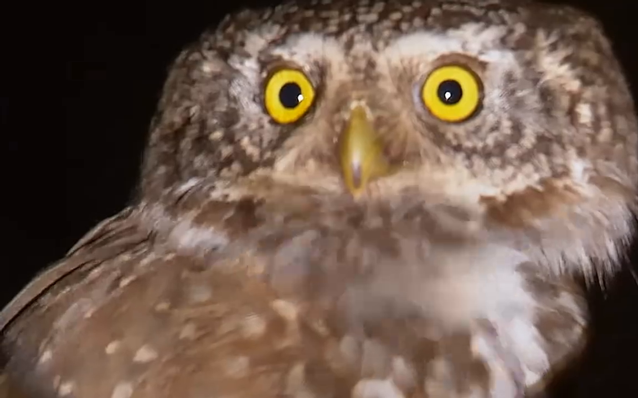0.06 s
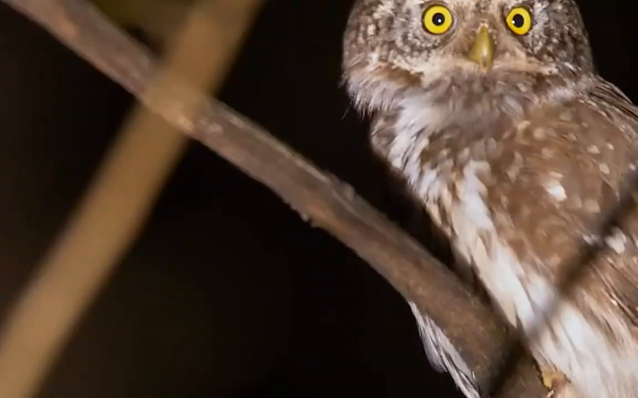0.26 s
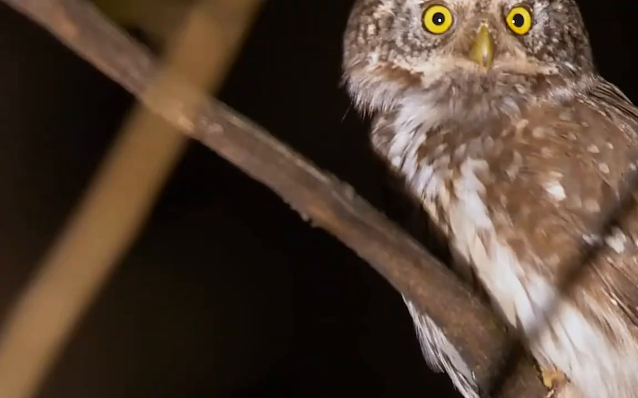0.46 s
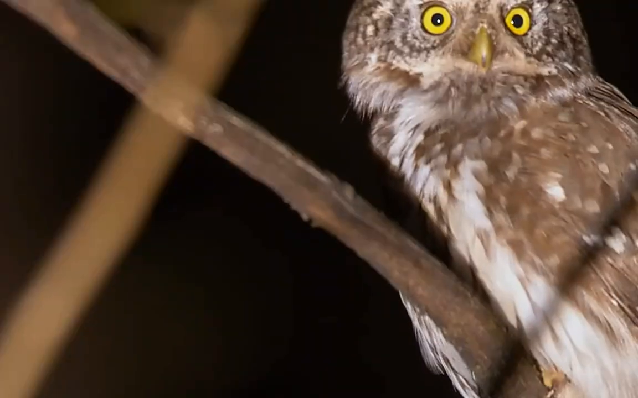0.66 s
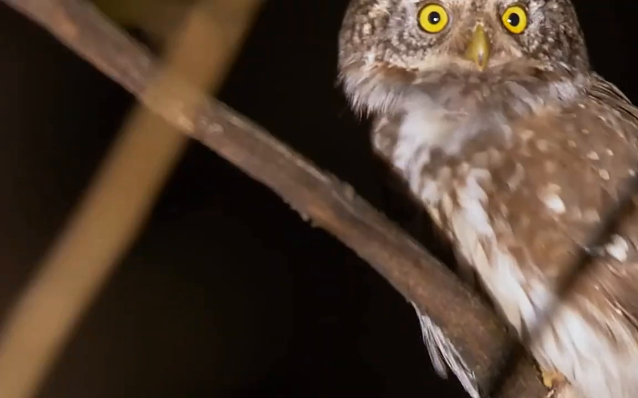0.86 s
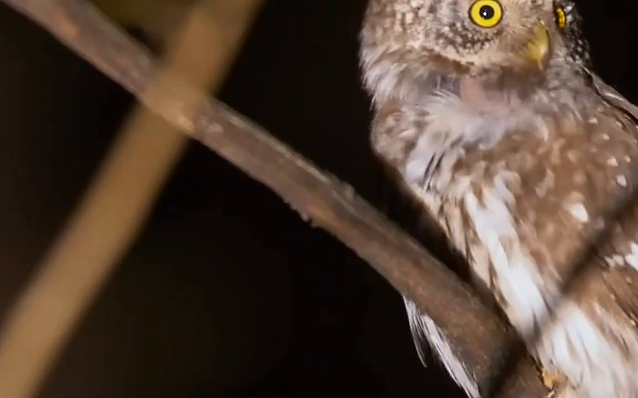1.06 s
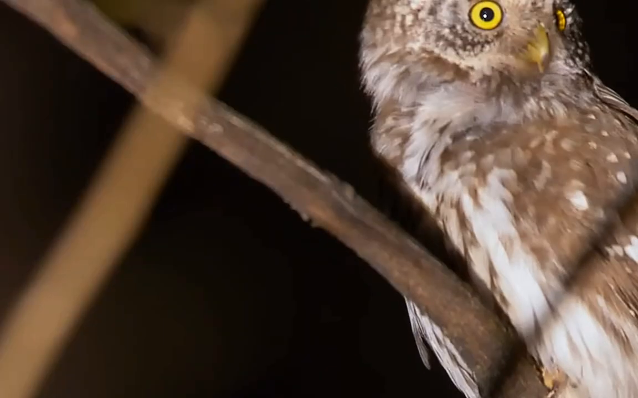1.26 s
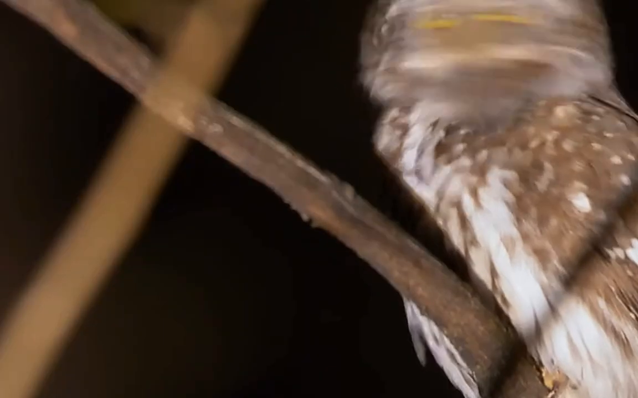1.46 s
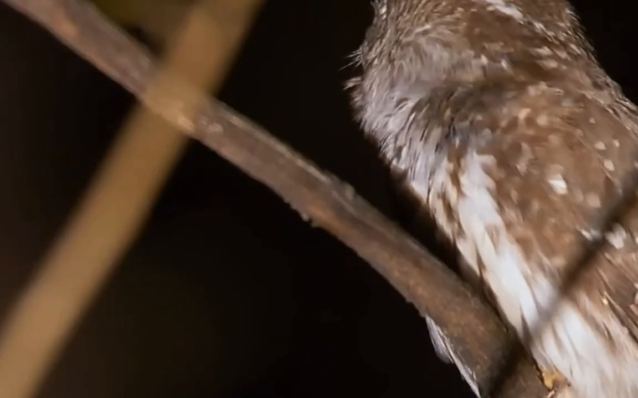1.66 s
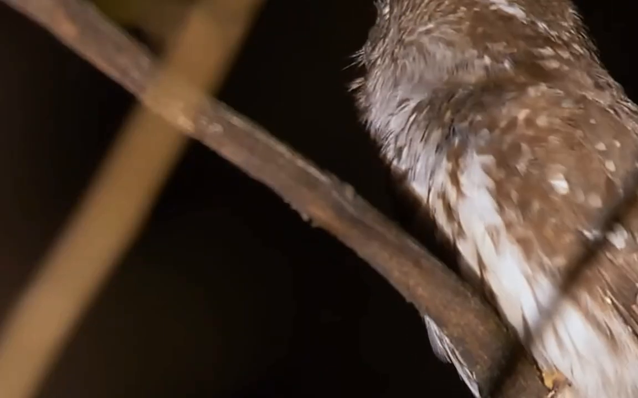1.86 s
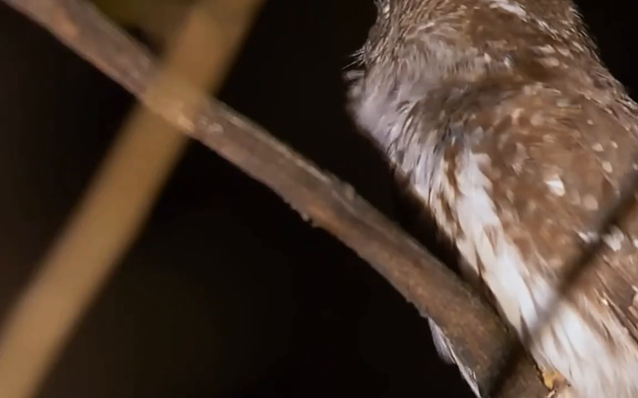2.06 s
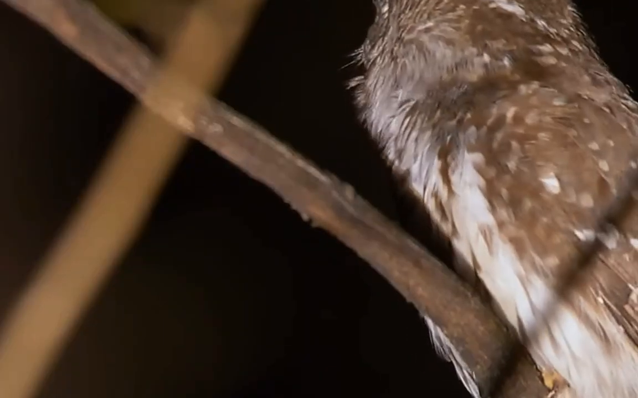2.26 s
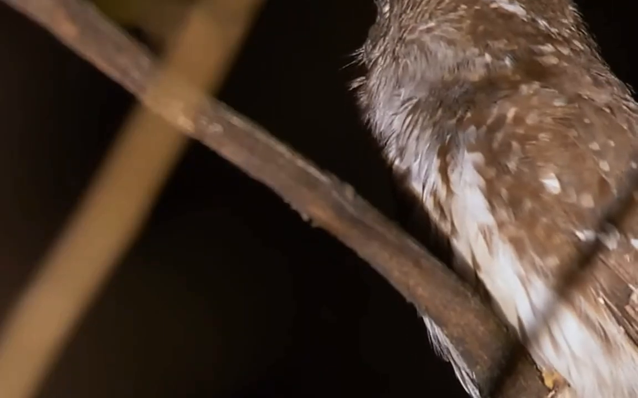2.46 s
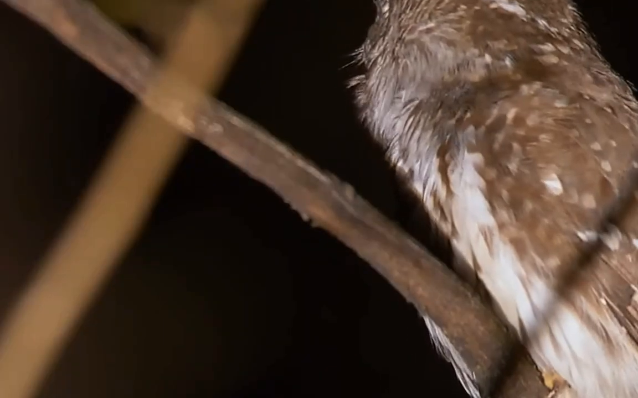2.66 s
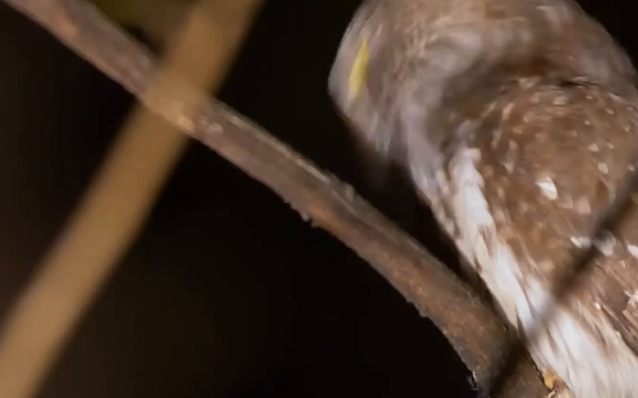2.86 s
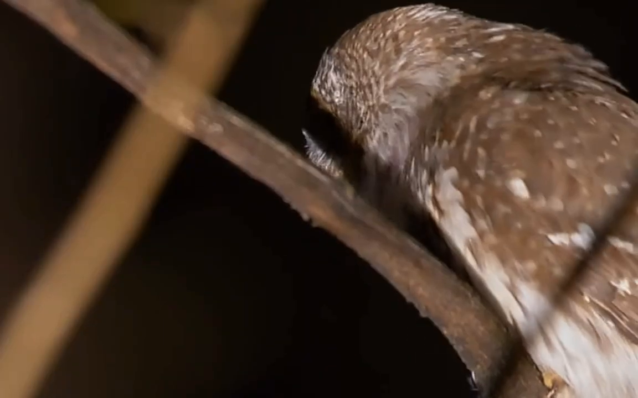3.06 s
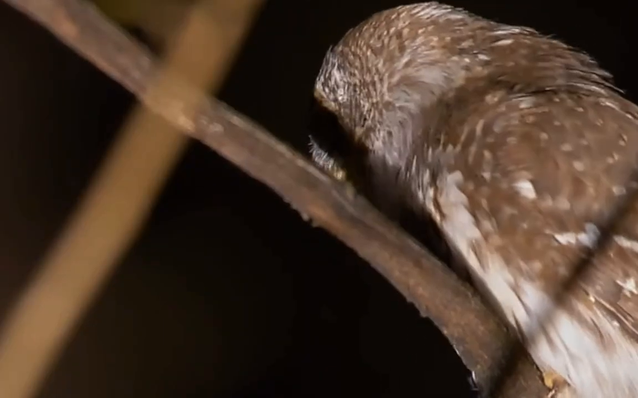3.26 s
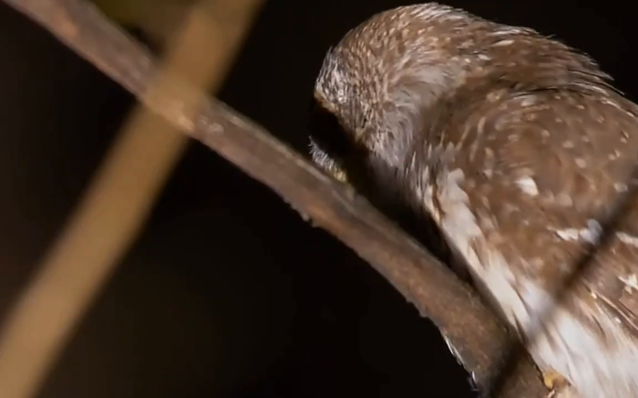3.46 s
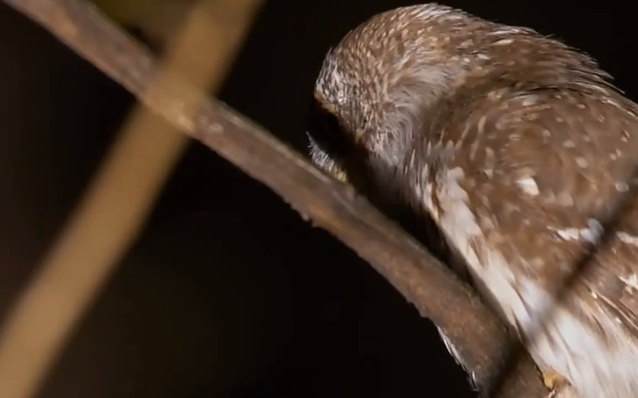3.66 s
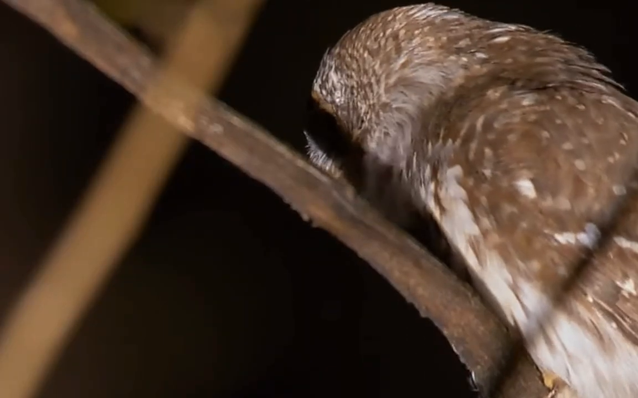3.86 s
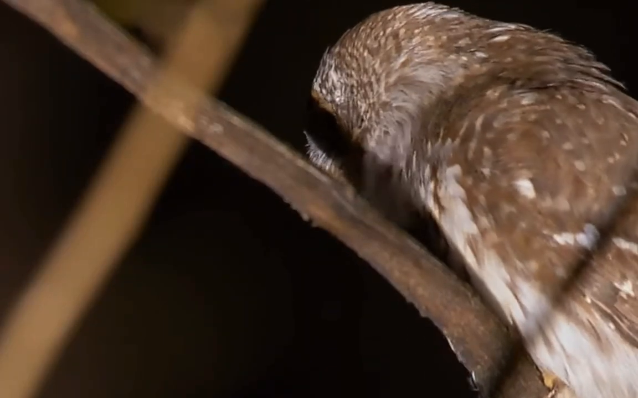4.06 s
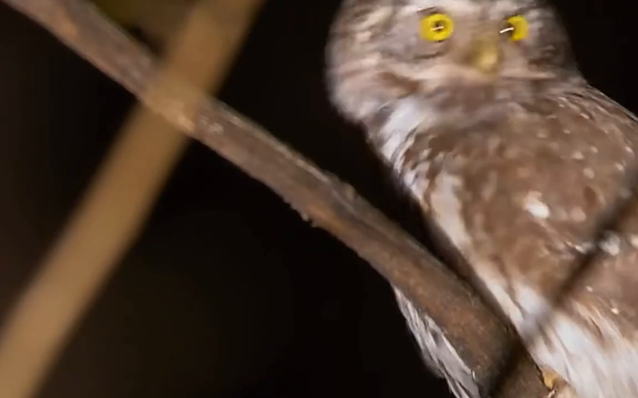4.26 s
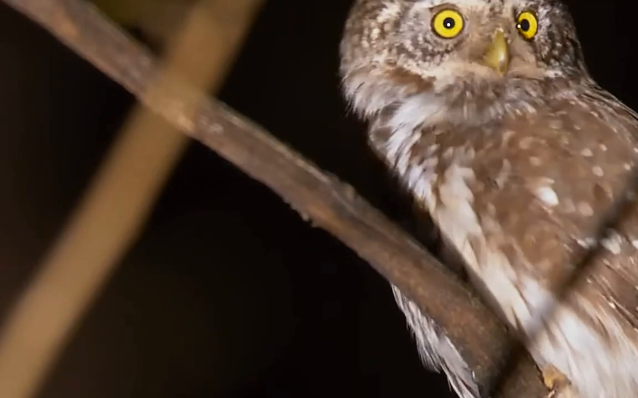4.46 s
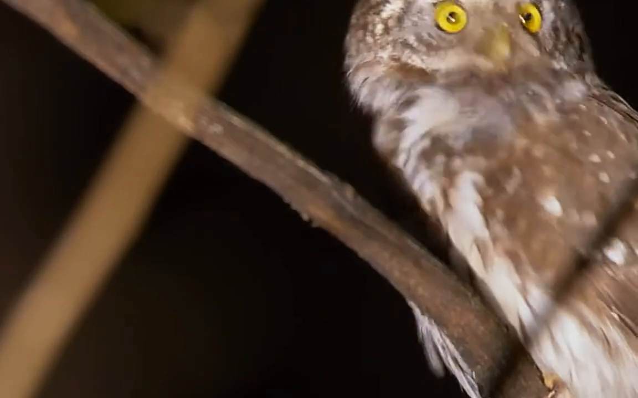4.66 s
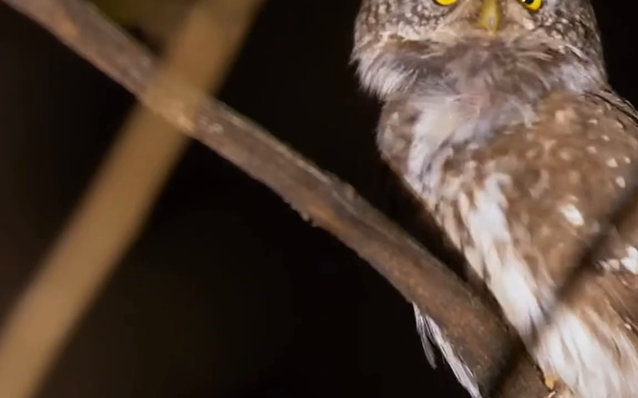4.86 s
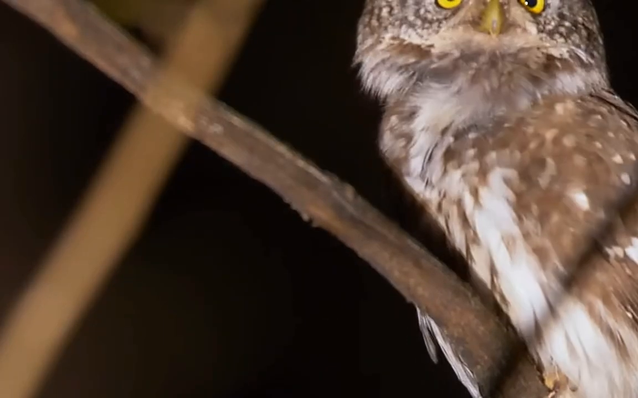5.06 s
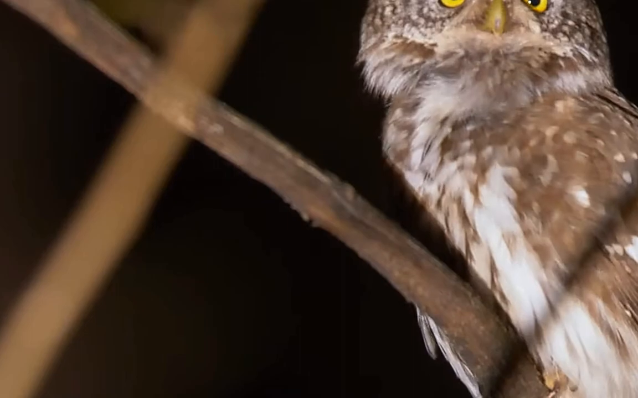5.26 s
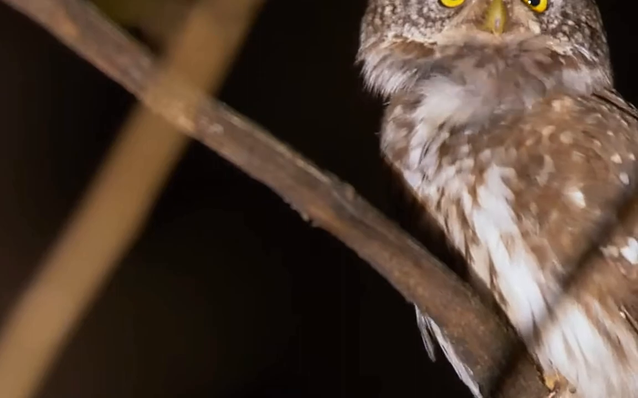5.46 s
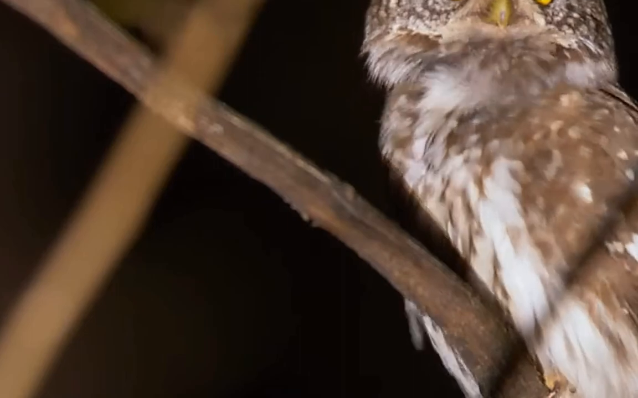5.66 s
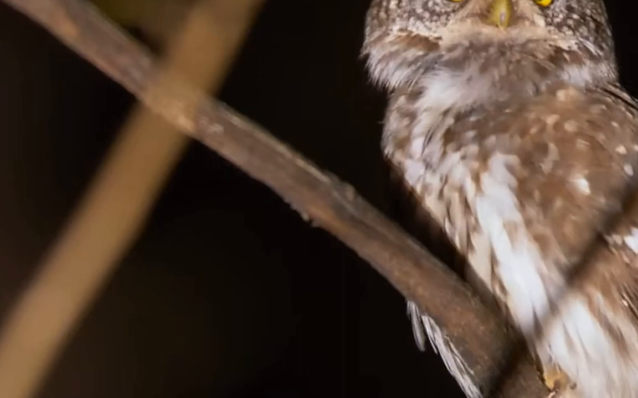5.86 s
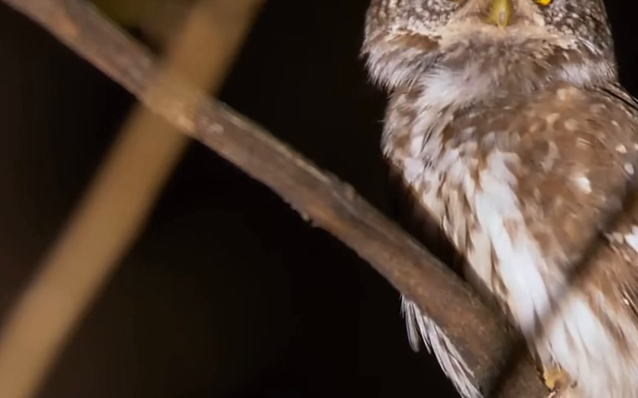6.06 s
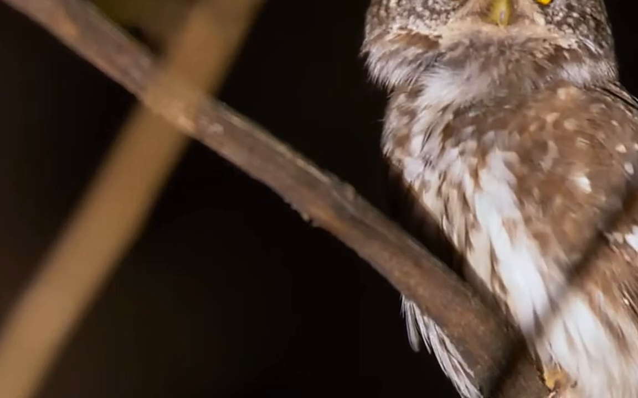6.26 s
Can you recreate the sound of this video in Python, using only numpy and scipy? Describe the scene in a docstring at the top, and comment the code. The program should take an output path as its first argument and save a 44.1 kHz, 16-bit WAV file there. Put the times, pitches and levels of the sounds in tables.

```python
"""Two soft toots over hissing air, then a small owl's long whistle: three whistles, toots before, between, after.
Owl notes are sines on multiples of a pitch curve, with breath noise on the whistles and an echo of the wood.
A far bird mews on harmonics alone; songbirds chirp and trill in gliding sines; shaped noise is the air.
The recorder turns its gain down on loud notes and cuts the top. Table levels are ahead of that gain."""
import sys
import numpy as np
from scipy import signal
from scipy.fft import rfft, irfft
from scipy.io import wavfile
from scipy.ndimage import uniform_filter1d

SR = 44100
rng = np.random.default_rng(int(sys.argv[2]) if len(sys.argv) > 2 else 0)


def unload_audio(sound):
    """Save the sound as a 16-bit wav file, at the path given as the first command line argument."""
    columns = np.transpose(np.atleast_2d(sound))
    # keep every value between -1 and 1, then stretch to whole-number steps
    steps = np.round(np.clip(columns, -1, 1) * 32767)
    wavfile.write(sys.argv[1], SR, steps.astype(np.int16))


N = 278712

# long whistles: t/s, pitch f/Hz, 1x level/dB, 2x level/dB, throat resonance f/Hz, harmonic on it level/dB
WHISTLES = [
    [(0.812, 1295, -33.5, -63, 10940, -89), (0.828, 1354, -21.5, -38, 11070, -82.5),
     (0.856, 1378, -15.5, -36.5, 11150, -78.5), (0.874, 1389, -14, -39, 11100, -51.5),
     (0.904, 1387, -13.5, -32, 10950, -56.5), (0.942, 1398, -15, -41, 10800, -60),
     (0.972, 1378, -13.5, -33, 10930, -57), (1.0, 1397, -11, -37, 10250, -50),
     (1.032, 1388, -14, -41, 10180, -47.5), (1.052, 1382, -14.5, -35.5, 10200, -53),
     (1.066, 1322, -20, -38, 9920, -79)],
    [(2.768, 1268, -39.5, -64.5, 12200, -90.5), (2.784, 1343, -24, -43.5, 12200, -83),
     (2.822, 1376, -15.5, -36.5, 12200, -82.5), (2.846, 1360, -16.5, -35, 12200, -82.5),
     (2.864, 1389, -13.5, -49, 12200, -79.5), (2.885, 1411, -16.5, -41.5, 12200, -57),
     (2.92, 1430, -14.5, -42.5, 12000, -64), (2.945, 1407, -14.5, -43, 11350, -44.5),
     (3.0, 1401, -15.5, -46, 11250, -51.5), (3.018, 1355, -19, -40, 11100, -47),
     (3.032, 1329, -23, -43.5, 11080, -62)],
    [(4.647, 1307, -34.5, -58, 11330, -77.5), (4.661, 1359, -21.5, -38, 11300, -87),
     (4.69, 1399, -15, -41.5, 11300, -83.5), (4.718, 1393, -16, -47.5, 11300, -71),
     (4.734, 1416, -12.5, -34.5, 11200, -56), (4.77, 1403, -15.5, -30, 10750, -50),
     (4.798, 1417, -12.5, -31, 10170, -44), (4.84, 1413, -12.5, -32, 10050, -42.5),
     (4.858, 1394, -15, -36.5, 10050, -45), (4.874, 1388, -9.5, -35, 10000, -45),
     (4.89, 1387, -13, -32.5, 9900, -47), (4.903, 1313, -21.5, -40, 9700, -58.5)],
]
# closing drop: t after last row/s, pitch f/Hz, level change/dB
WHISTLE_DROP = [(0.013, 1234, -6), (.024, 894, -24)]
# 5x harmonic of each whistle: start level/dB, level near the end/dB
FIFTH = [(-76, -59.5), (-79, -69), (-80.5, -57.5)]
# breath, strongest as the note catches: t from start/s, level/dB
BREATH = [(0, -73), (.012, -57.5), (.035, -59), (.055, -74), (.25, -70.5), (.28, -88)]
# breath band edges: f/Hz, f/Hz
BREATH_HZ = (710, 2530)
THIRD_DB = -77
FOURTH_RE_FIFTH_DB, SIXTH_RE_FIFTH_DB = -3, -9.5
GROWTH_POWER = 2.2
WEAK_FADE = 3.5   # dB lost by weak harmonics per dB lost by 1x
SECOND_DROP_SHARE = 0.67   # 2x loses less in the drop
RESONANCE_SLOPE_DB_PER_KHZ = 18
HALF_LINE_FULL_DB = -44


def whistles():
    """Harmonics 4 to 6 grow through the note; 7 to 8.5 fall off either side of a throat resonance."""
    multiples = [1, 1.5, 2, 3, 4, 5, 6, 7, 8, 8.5]
    out = 0
    for rows, (fifth_start_db, fifth_end_db) in zip(WHISTLES, FIFTH):
        end_s, _, end_db, end_second_db, end_top_hz, end_top_db = rows[-1]
        drop = [(end_s + s, hz, end_db + db, end_second_db + SECOND_DROP_SHARE * db,
                 end_top_hz, end_top_db + 2 * db) for s, hz, db in WHISTLE_DROP]
        at, *columns = np.transpose(list(rows) + drop)
        s = np.arange(at[0], at[-1], .002)
        hz, first_db, second_db, top_hz, top_db = (np.interp(s, at, c) for c in columns)

        fade_db = WEAK_FADE * np.minimum(first_db - np.median(first_db) + 2.5, 0)
        along = np.clip((s - at[0]) / (rows[-2][0] - at[0]), 0, 1)
        growth_db = (fifth_end_db - fifth_start_db) * along ** GROWTH_POWER
        fifth_db = fifth_start_db + growth_db + fade_db
        half_db = half_line_db(s)

        high_db = []
        for k in (7, 8, 8.5):
            offset_khz = np.abs(k * hz - top_hz) / 1000
            high_db.append(top_db - RESONANCE_SLOPE_DB_PER_KHZ * offset_khz)
        high_db[2] = high_db[2] + half_db - HALF_LINE_FULL_DB   # 8.5x follows the period doubling

        levels = [first_db, half_db + fade_db / 2, second_db, THIRD_DB + fade_db,
                  fifth_db + FOURTH_RE_FIFTH_DB, fifth_db, fifth_db + SIXTH_RE_FIFTH_DB, *high_db]
        out = out + sing(np.transpose([s, hz, *levels]), multiples, rough_db=-38)
        out = out + noise_band(BREATH, *BREATH_HZ, start_s=at[0])
    return out


# period doublings: start t/s, length/s, 1.5x level/dB
DOUBLINGS = [(.85, 0.038, -54), (.92, 0.033, -53), (.972, 0.042, -53.5), (2.85, 0.095, -45),
             (2.955, 0.043, -61.5), (4.68, .07, -55.5), (4.78, 0.037, -55.5), (4.845, .035, -62.5)]
DOUBLING_REST_DB = -74


def half_line_db(s):
    """Level of the 1.5x line: the voice briefly doubles its period and half lines swell and fade."""
    swells = 0
    for start_s, length_s, db in DOUBLINGS:
        swells = swells + amp(db) * np.sin(np.pi * np.clip((s - start_s) / length_s, 0, 1))
    return 20 * np.log10(swells + amp(DOUBLING_REST_DB))


# toots: start t/s, length/s, first f/Hz, last held f/Hz, early level/dB, late level/dB, 2x level/dB
TOOTS = [ (0.053, 0.055, 1255, 1193, -37, -38, -42.5), (.171, 0.045, 1211, 1104, -40.5, -41, -44.5),
         (2.002, 0.047, 1252, 1212, -36, -36, -44.5), (2.091, 0.068, 1208, 1224, -33, -29, -38.5),
         (3.713, 0.041, 1223, 1224, -45, -55.5, -75), (3.781, 0.081, 1284, 1251, -30.5, -26, -40),
         (3.937, 0.05, 1138, 1081, -36.5, -38, -46), (4.045, .04, 1086, 1045, -42, -36.5, -43),
         (5.463, 0.056, 1218, 1207, -33.5, -34, -36), (5.565, 0.077, 1244, 1216, -26, -27, -34),
         (5.693, 0.055, 1200, 1128, -41, -35.5, -39), ]
# closing drop: t before end/s, share of held pitch, level change/dB, 2x level change/dB
TOOT_DROP = [(.013, .95, -6, -10.5), (0.002, 0.73, -23.5, -19.5)]
TOOT_ATTACK_S, TOOT_ATTACK_DB, TOOT_SECOND_LAG_DB = .011, -14.5, -10.5
TOOT_HOLD_ENDS_S = .021   # before the end


def toots():
    """Short soft notes: quick attack, a gliding hold in which 2x grows, a closing drop."""
    out = 0
    for start_s, length_s, first_hz, last_hz, early_db, late_db, second_db in TOOTS:
        end_s = start_s + length_s
        lagging_db = second_db + TOOT_SECOND_LAG_DB
        rows = [(start_s, first_hz, early_db + TOOT_ATTACK_DB, lagging_db + 2 * TOOT_ATTACK_DB),
                (start_s + TOOT_ATTACK_S, first_hz, early_db, lagging_db),
                (end_s - TOOT_HOLD_ENDS_S, last_hz, late_db, second_db)]
        for before_s, share, db, upper_db in TOOT_DROP:
            rows.append((end_s - before_s, last_hz * share, late_db + db, second_db + upper_db))
        with_third = [(*row, row[3] - 37) for row in rows]
        out = out + sing(with_third, [1, 2, 3], rough_db=-28)
    return out


# mew shapes: t from start/s, pitch f/Hz, 2x level/dB, 3x level/dB, 4x level/dB
LONG_MEW = [(0, 836, -58, -81, -84), (.03, 974, -52, -72, -88), (.08, 1016, -49.5, -75, -90),
            (.125, 1038, -54, -67, -77), (.165, 993, -61.5, -59.5, -71.5), (.205, 966, -87.5, -49, -78),
            (.238, 802, -80.5, -63.5, -93)]
SHORT_MEW = [(0, 861, -55, -87, -91), (.02, 1013, -50, -86.5, -88), (.05, 1044, -49, -87.5, -90.5),
             (.086, 1056, -47.5, -81.5, -85), (.1, 1005, -49.5, -77.5, -87.5), (.117, 752, -61.5, -92, -87)]
# calls: start t/s, stretch, time-warp power, pitch factor, level change/dB
LONG_MEWS = [(3.908, 0.99, .95, 1.002, 0), (5.8, .97, 1.2, .995, -0.2)]
SHORT_MEWS = [(4.283, .98, 1.02, 1.005, 0.55), (6.178, 1.02, 1.02, .995, -0.79)]


def mews():
    """Far mews of two shapes, sung on 2x to 5x without the fundamental; a faint 5x follows 4x."""
    out = 0
    for shape, calls in ((LONG_MEW, LONG_MEWS), (SHORT_MEW, SHORT_MEWS)):
        length_s = shape[-1][0]
        for start_s, stretch, power, factor, db in calls:
            rows = []
            for s, hz, second_db, third_db, fourth_db in shape:
                t = start_s + stretch * length_s * (s / length_s) ** power
                rows.append((t, factor * hz, second_db + db, third_db + db, fourth_db + db, fourth_db + db - 5))
            out = out + sing(rows, [2, 3, 4, 5], rough_db=-15)
    return out


# falling note: t from start/s, f/Hz, level/dB
FALL_SHAPE = [(0, 3300, -70), (.007, 2600, -56), (.026, 2250, -47), (0.036, 1950, -52.5),
              (.046, 1600, -56.5)]
# its repeats: start t/s, stretch, level change/dB
FALLS = [(3.084, 0.74, -1), (3.139, 1.12, 2), (3.203, 0.86, 2), (3.272, 0.89, 1), (3.341, 0.99, -1.5)]
# V notes: turn t/s, start f/Hz, turn f/Hz, end f/Hz, fall/s, rise/s, level at turn/dB
VEES = [(.089, 6500, 5500, 6050, 0.011, 0.011, -64.5), (.239, 6300, 5620, 6200, 0.011, 0.0094, -62.5),
        (.421, 6300, 5540, 5950, 0.014, 0.011, -67.5), (1.228, 6000, 4700, 5900, 0.022, 0.013, -62),
        (1.28, 5900, 4358, 5560, 0.019, .013, -60), (1.32, 6000, 3993, 5800, 0.021, 0.016, -57.5),
        (1.355, 5900, 3670, 5240, 0.018, 0.011, -58)]


def phrases():
    """A repeated steep falling note, and V notes whose pitch falls, turns and rises."""
    out = 0
    for start_s, stretch, change_db in FALLS:
        rows = [(start_s + stretch * s, hz, db + change_db) for s, hz, db in FALL_SHAPE]
        out = out + sing(rows, [1], rough_db=-23)
    for turn_s, start_hz, turn_hz, end_hz, fall_s, rise_s, db in VEES:
        rows = [(turn_s - fall_s, start_hz, db - 8.0), (turn_s, turn_hz, db), (turn_s + rise_s, end_hz, db - 11)]
        out = out + sing(rows, [1], rough_db=-9)
    return out


# rough falling buzz: t/s, f/Hz, level/dB
BUZZ = [(2.888, 3554, -68), (2.91, 3420, -59), (2.96, 3160, -55.5), (3.0, 2515, -51), (3.03, 2040, -67)]
# gliding notes, mostly songbirds: start t/s, length/s, first f/Hz, middle f/Hz, last f/Hz, peak level/dB
CHIRPS = [ (0.105, 0.059, 6470, 6250, 6130, -69.5), (0.274, 0.028, 6470, 6430, 6230, -66.5),
          (0.45, 0.037, 6230, 6400, 5900, -70), (1.122, 0.12, 5470, 5140, 5730, -67.5),
          (1.154, 0.041, 6440, 5952, 6020, -64.5), (1.252, 0.014, 5300, 4440, 3800, -61),
          (1.29, 0.015, 4861, 4230, 3750, -59), (1.331, 0.015, 4720, 4100, 3500, -62),
          (1.467, 0.068, 5710, 5580, 5850, -59), (2.122, 0.038, 1855, 1800, 1760, -53),
          (2.212, 0.019, 560, 582, 550, -70), (2.674, 0.026, 2030, 3183, 3686, -53),
          (2.715, 0.026, 2474, 2910, 3300, -51.5), (2.802, 0.011, 3500, 3780, 4160, -62),
          (2.85, 0.023, 3175, 4040, 3950, -50), (3.441, 0.066, 570, 595, 645, -69),
          (4.263, 0.028, 1770, 2150, 2400, -48), (5.992, 0.06, 3500, 3495, 3380, -68),
          (6.004, 0.018, 493, 498, 510, -70), (6.143, 0.053, 3190, 3230, 3100, -67),
          (6.16, .026, 1950, 2090, 2430, -50.5), ]
# trills: start t/s, end t/s, rate/(notes/s), note length/s, timing spread/s
TRILL_TIMING = [ (4.482, 4.92, 24.4, .028, 0), (4.5, 4.92, 24.4, .032, 0), (1.522, 1.72, 64.0, .014, .002),
                (1.48, 1.72, 64.0, .014, .003), ]
# their notes: first f/Hz, middle f/Hz, last f/Hz, climb/Hz, first peak level/dB, last peak level/dB
TRILL_NOTES = [ (2070, 2230, 2480, 320, -44, -49), (1860, 1790, 1720, 190, -55.5, -52),
               (6530, 5850, 5400, 170, -61, -69), (4880, 5700, 6500, 140, -65, -68.5), ]


def songbirds():
    """A buzz, single chirps, and trills that repeat one chirp, climbing fast at first."""
    out = sing(BUZZ, [1], rough_db=3.0, rough_hz=250)
    for chirp in CHIRPS:
        add_chirp(out, *chirp)
    for timing, notes in zip(TRILL_TIMING, TRILL_NOTES):
        start_s, end_s, notes_per_s, length_s, spread_s = timing
        *hz, climb_hz, first_db, last_db = notes
        for s in np.arange(start_s, end_s, 1 / notes_per_s):
            along = (s - start_s) / (end_s - start_s)
            note_s = s + spread_s * rng.standard_normal()
            note_hz = np.array(hz) + climb_hz * np.sqrt(along)
            add_chirp(out, note_s, length_s, *note_hz, first_db + (last_db - first_db) * along)
    return out


def add_chirp(out, start_s, length_s, first_hz, middle_hz, last_hz, db):
    """A sine gliding on a parabola through three pitches under a half-sine envelope."""
    u = np.arange(int(length_s * SR)) / (length_s * SR)
    hz = np.polyval(np.polyfit([0, .5, 1], [first_hz, middle_hz, last_hz], 2), u)
    i = int(start_s * SR)
    out[i:i + len(u)] += amp(db) * np.sin(np.pi * u) * np.sin(2 * np.pi * np.cumsum(hz) / SR)


# echo of the whistles: band top f/Hz, t60/s, level/dB
WOOD = [(1070, 0.72, -12.5), (1710, 1.446, -19), (2498, 0.27, -11.5), (3456, 0.78, -16), (8100, .4, -19)]
# echo of the soft sounds: band top f/Hz, t60/s, level/dB
WOOD_SOFT = [(1190, 0.4, -11.5), (1800, 0.99, -14.5), (3100, 0.45, -16), (8000, 1, -16.5)]
NEAR_TRUNKS_T60_S = 0.16


def wood(x, bands, near_db):
    """Near trunks give a quick dense scatter, the deep wood a slower tail with its own decay per band."""
    t = np.arange(2 * SR) / SR
    near = amp(-60 * t / NEAR_TRUNKS_T60_S) * np.clip(t / .006, 0, 1)
    near = near / np.sqrt(np.sum(near ** 2))
    tail, low_hz = 0, 200
    for top_hz, t60_s, db in bands:
        sos = signal.butter(2, [low_hz, top_hz], "band", fs=SR, output="sos")
        band = signal.sosfilt(sos, rng.standard_normal(len(t)))
        deep = amp(-60 * t / t60_s) * np.clip(t / 0.067, 0, 1)
        decay = deep / np.sqrt(np.sum(deep ** 2)) + amp(near_db) * near
        tail = tail + amp(db) * band * decay
        low_hz = top_hz
    return signal.fftconvolve(x, tail)[:N]


# hiss spectrum before scaling to AIR_DB: f/Hz, relative level/dB per Hz
AIR = [(24, -58.5), (40, -27.5), (188, -28.5), (213, -17), (351, -17), (608, -13), (725, -16.5), (1000, 6),
       (1160, -10.5), (1490, 0.5), (4270, -2.5), (9730, -4), (15600, -10.5)]
# faint low noise that comes and goes: t/s, level/dB
MURMUR = [(0.0, -96), (0.76, -94), (1.11, -94.5), (1.78, -88.5), (2.64, -88.5), (3.08, -85), (3.33, -92),
          (3.47, -78), (3.66, -83), (4.35, -90), (4.56, -89), (5.1, -86), (5.75, -103), (6.1, -93),
          (6.32, -89)]
# its band edges: f/Hz, f/Hz
MURMUR_HZ = (467, 697)
# soft rush of noise under the late mews: t/s, level/dB
RUSH = [(5.75, -92), (5.9, -58.5), (6.05, -58.5), (6.25, -70.5)]
# its band edges: f/Hz, f/Hz
RUSH_HZ = (1007.4, 1450)
AIR_DB = -65.5
HUM_HZ, HUM_DB = 224, -100


def air():
    """Spectrally shaped hiss, a faint wavering sine hum, a low band of noise and a soft rush."""
    hz = np.maximum(np.arange(N // 2 + 1) * SR / N, 1)
    air_hz, air_db = np.transpose(AIR)
    colour = amp(np.interp(np.log(hz), np.log(air_hz), air_db))
    hiss = rms_one(irfft(rfft(rng.standard_normal(N)) * colour, N))
    hum = amp(HUM_DB) * np.sin(2 * np.pi * HUM_HZ * np.arange(N) / SR)
    hum = hum * (1 + 0.21 * drift(8, size=N))
    far = noise_band(MURMUR, *MURMUR_HZ) + noise_band(RUSH, *RUSH_HZ)
    return amp(AIR_DB + 0.1 * drift(2.6, size=N)) * hiss + hum + far


def sing(rows, multiples, rough_db, rough_hz=250):
    """One note: sines on multiples of a pitch curve, each with its rms level column."""
    s, hz, *levels = np.transpose(rows)
    at = np.arange(int(s[0] * SR), min(int(s[-1] * SR), N))
    t = at / SR

    def smooth(column):
        """Sampled curve with rounded corners."""
        return uniform_filter1d(np.interp(t, s, column), size=160, mode="nearest")

    phase = 2 * np.pi * np.cumsum(smooth(hz)) / SR
    edge = np.sin(np.pi / 2 * np.clip(np.minimum(t - t[0], t[-1] - t) / .006, 0, 1)) ** 2
    sos = signal.butter(4, rough_hz, fs=SR, output="sos")
    unsteady = signal.sosfilt(sos, rng.standard_normal(len(t)))
    flutter = 1 + amp(rough_db) * rms_one(unsteady)   # unsteady airflow: a haze round each line
    lines = sum(amp(smooth(db)) * np.sin(k * phase) for k, db in zip(multiples, levels))
    out = np.zeros(N)
    out[at] = np.sqrt(2) * edge * flutter * lines
    return out


def noise_band(rows, low_hz, high_hz, start_s=0):
    """Noise between two band edges on a level curve; silent outside the curve."""
    s, db = np.transpose(rows)
    sos = signal.butter(5, [low_hz, high_hz], "band", fs=SR, output="sos")
    band = rms_one(signal.sosfilt(sos, rng.standard_normal(N)))
    return amp(np.interp(np.arange(N) / SR - start_s, s, db, left=-200, right=-200)) * band


def drift(rate_hz, size):
    """Slow random curve of rms 1: noise through two equal low-pass poles."""
    r = np.exp(-2 * np.pi * rate_hz / SR)
    noise = rng.standard_normal(size + 4000)
    return rms_one(signal.lfilter([1], [1, -2 * r, r * r], noise)[4000:])


def rms_one(x):
    """Scale to rms 1."""
    return x / np.sqrt(np.mean(x ** 2) + 1e-20)


def amp(db):
    """dB to gain."""
    return 10 ** (np.asarray(db) / 20)


ECHO_WAVER_DB, ECHO_WAVER_HZ = 2.1, 15


def scene():
    """Owl and other birds with the wood's echo, which moving air makes swell and sink, over the air."""
    loud = whistles()
    soft = toots() + mews() + phrases() + songbirds()
    echo = wood(loud, WOOD, near_db=0.0) + wood(soft, WOOD_SOFT, near_db=3.5)
    waver = amp(ECHO_WAVER_DB * drift(ECHO_WAVER_HZ, size=N))
    return (loud + soft + waver * echo + air())[None]


CUTOFF_HZ = 15720


def record(dry, start_db=-26, ratio=0.44, attack_s=0.07, release_db_per_s=5.0, lift_db=6.0):
    """Gain control: sinks soon above a threshold, climbs back slowly; then a steep low-pass."""
    t = np.arange(N) / SR
    level_db = 10 * np.log10(uniform_filter1d(dry[0] ** 2, size=800) + 1e-12)
    cut_db = ratio * np.maximum(level_db - start_db, 0)
    held_db = np.maximum.accumulate(cut_db + release_db_per_s * t) - release_db_per_s * t
    r = np.exp(-1 / (attack_s * SR))
    gain = amp(lift_db - signal.lfilter([1 - r], [1, -r], held_db))
    low_pass = signal.ellip(14, .5, 70, CUTOFF_HZ, fs=SR, output="sos")
    return signal.sosfilt(low_pass, dry * gain)


dry = scene()
out = record(dry)
unload_audio(out)
```